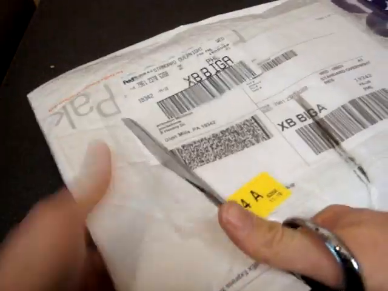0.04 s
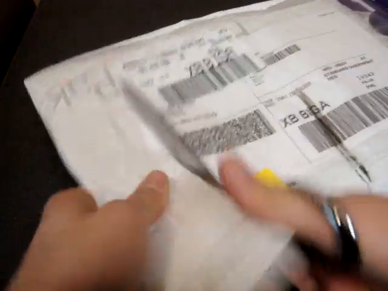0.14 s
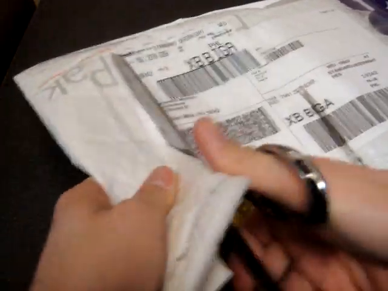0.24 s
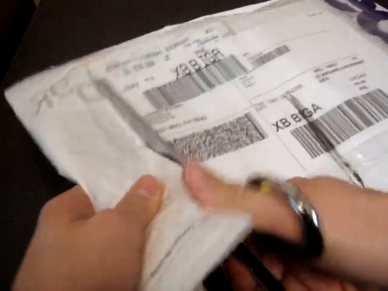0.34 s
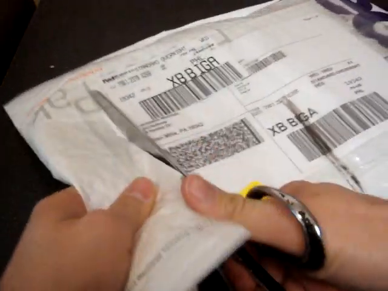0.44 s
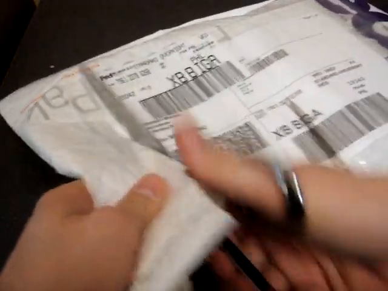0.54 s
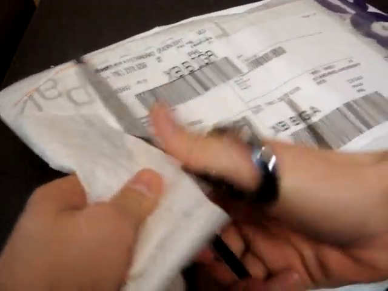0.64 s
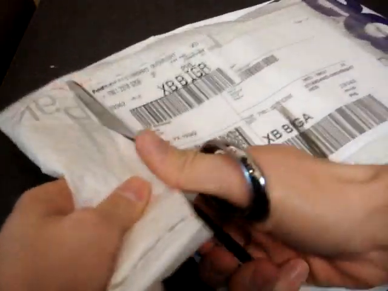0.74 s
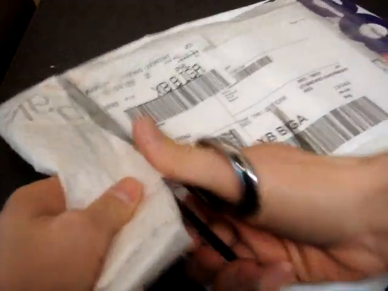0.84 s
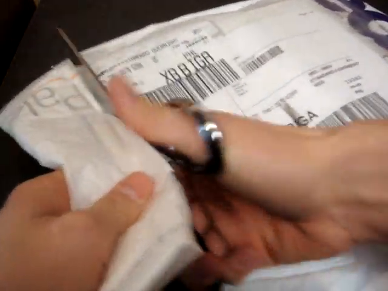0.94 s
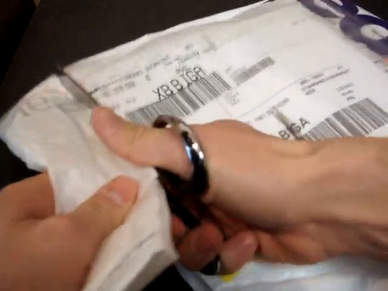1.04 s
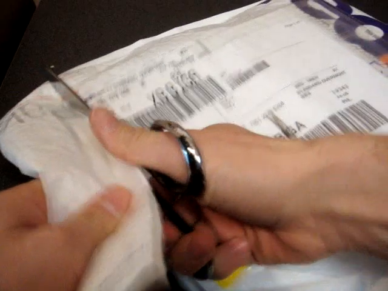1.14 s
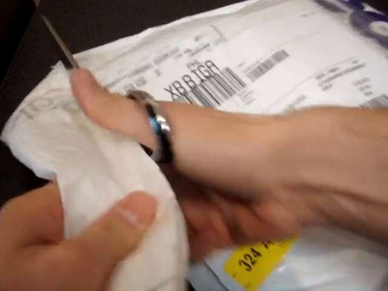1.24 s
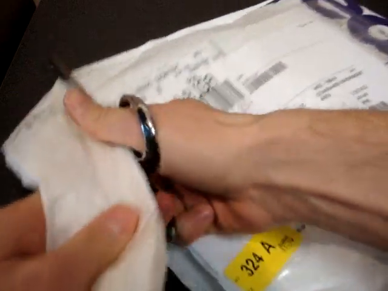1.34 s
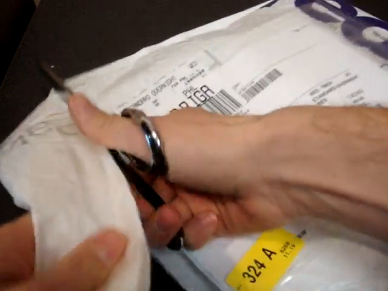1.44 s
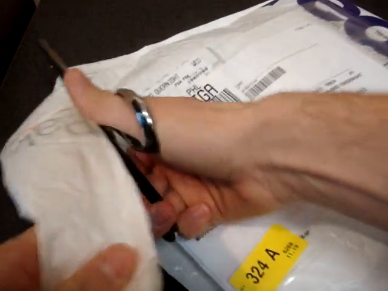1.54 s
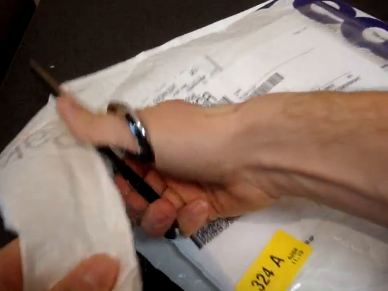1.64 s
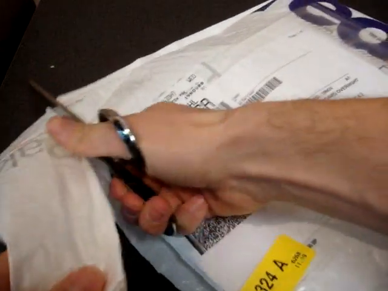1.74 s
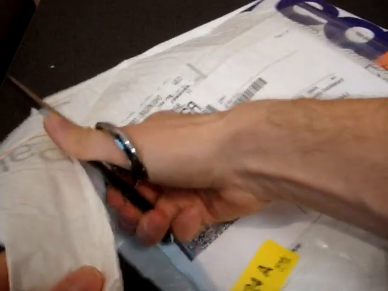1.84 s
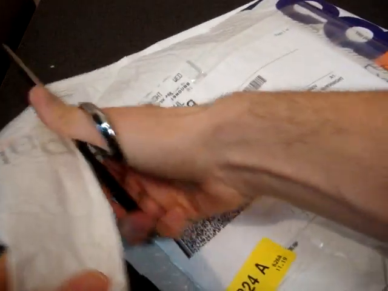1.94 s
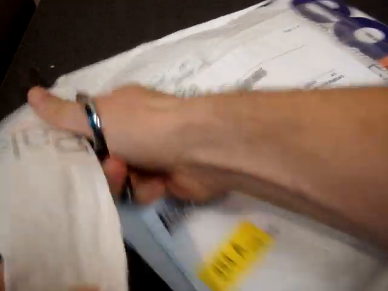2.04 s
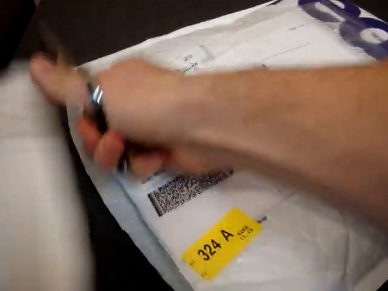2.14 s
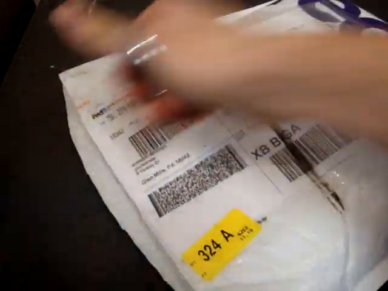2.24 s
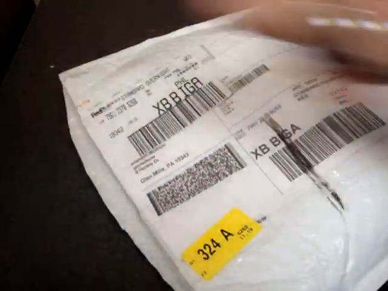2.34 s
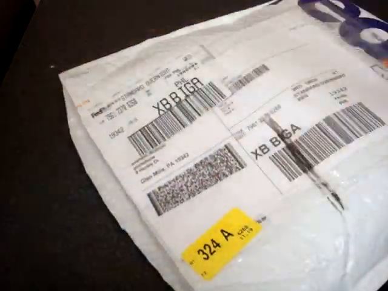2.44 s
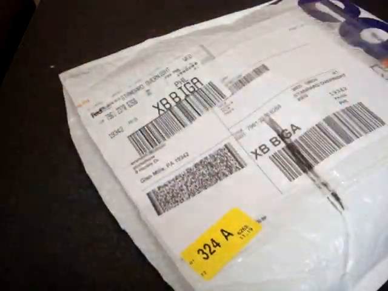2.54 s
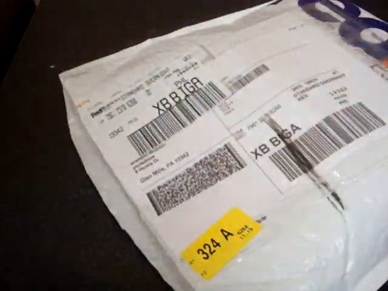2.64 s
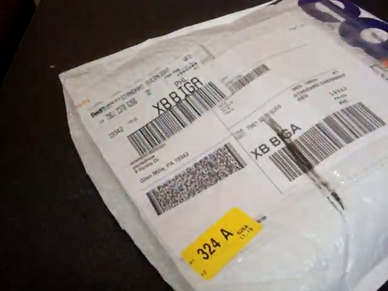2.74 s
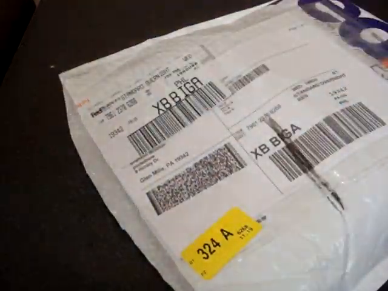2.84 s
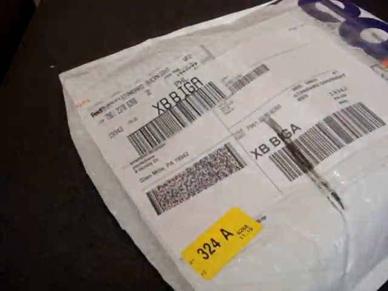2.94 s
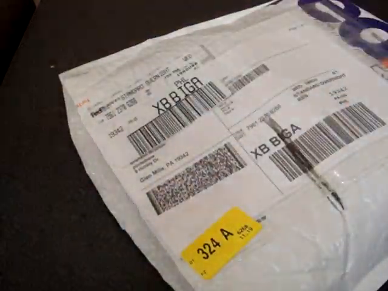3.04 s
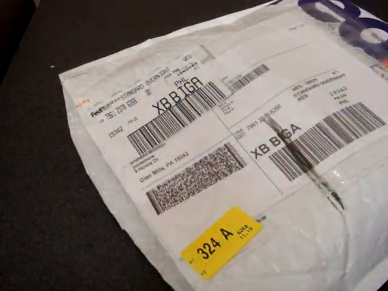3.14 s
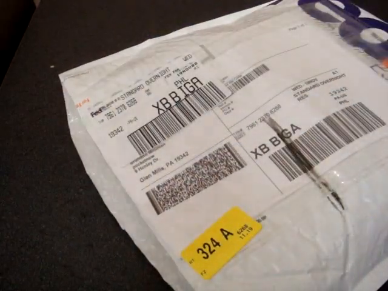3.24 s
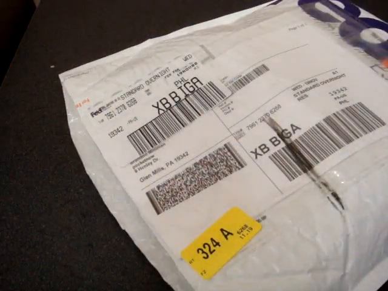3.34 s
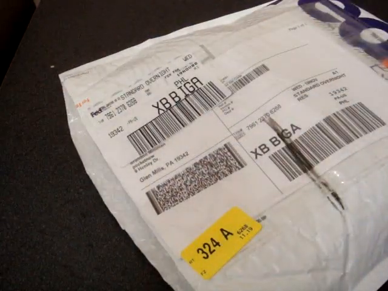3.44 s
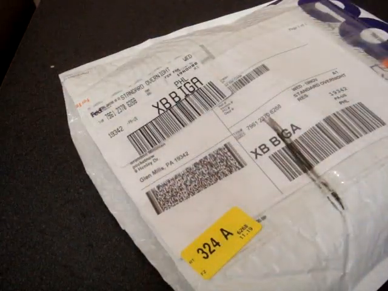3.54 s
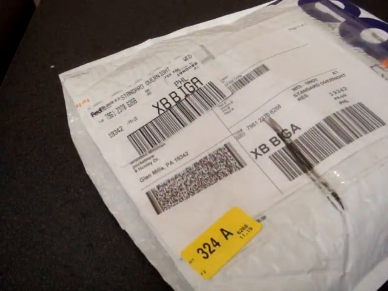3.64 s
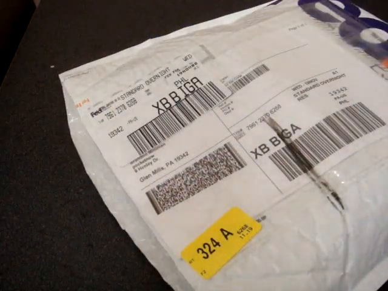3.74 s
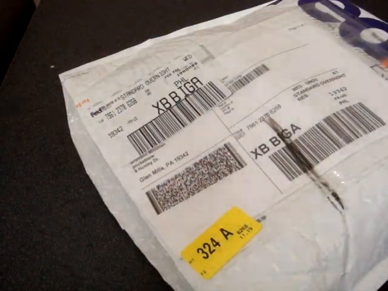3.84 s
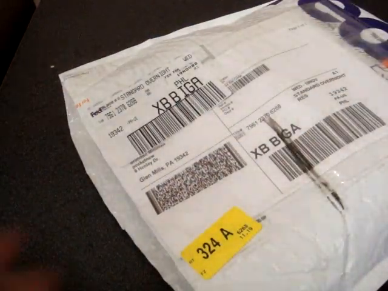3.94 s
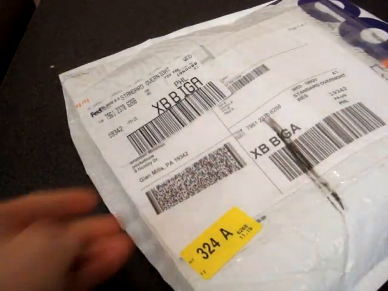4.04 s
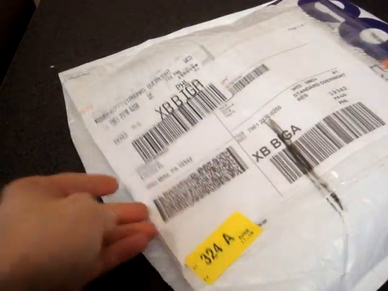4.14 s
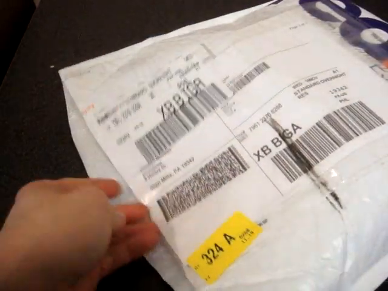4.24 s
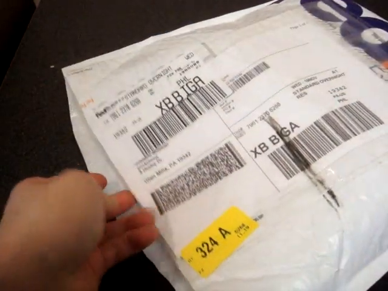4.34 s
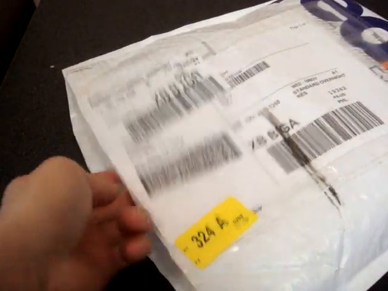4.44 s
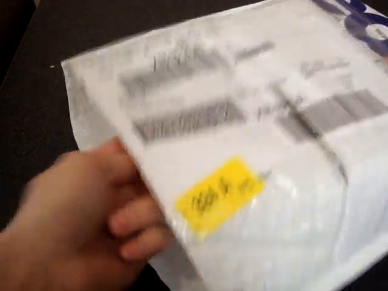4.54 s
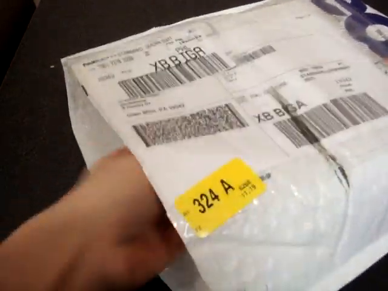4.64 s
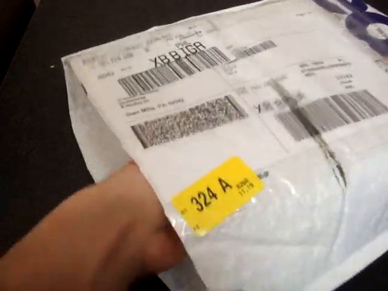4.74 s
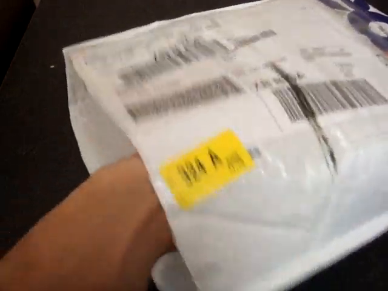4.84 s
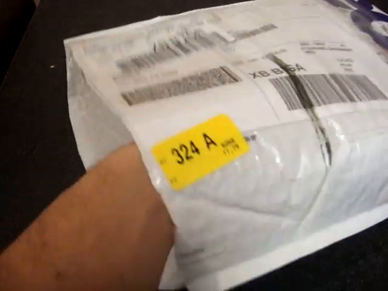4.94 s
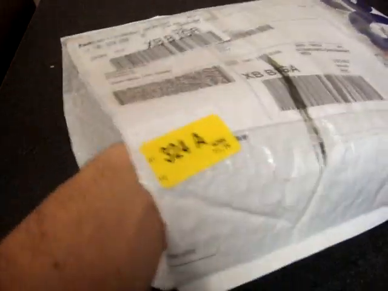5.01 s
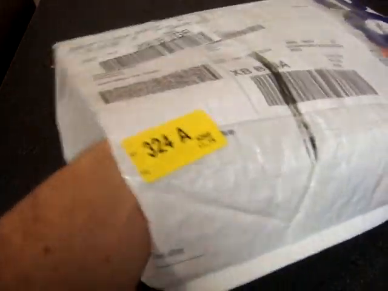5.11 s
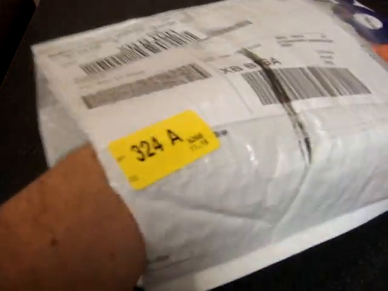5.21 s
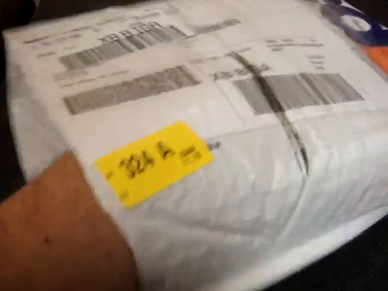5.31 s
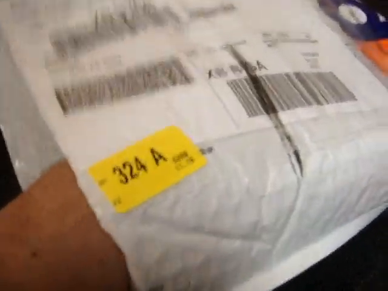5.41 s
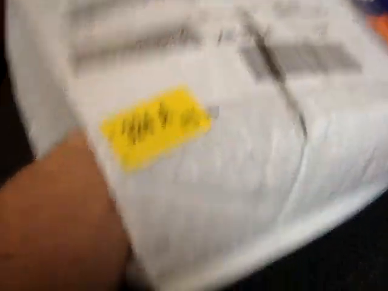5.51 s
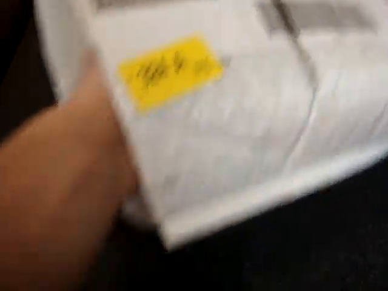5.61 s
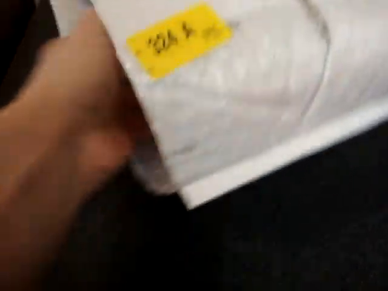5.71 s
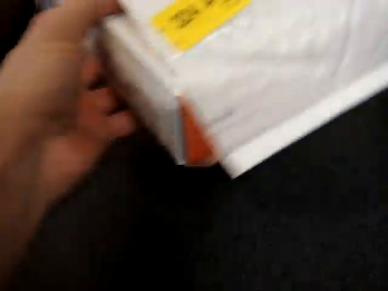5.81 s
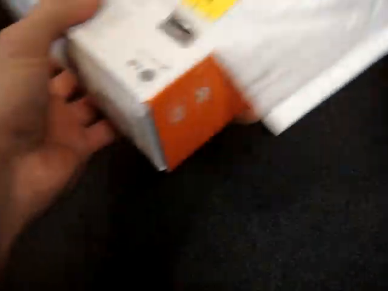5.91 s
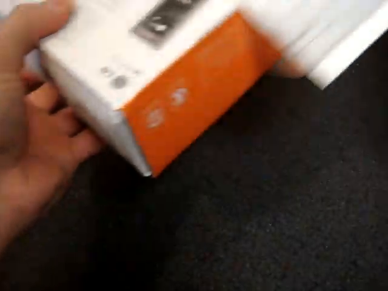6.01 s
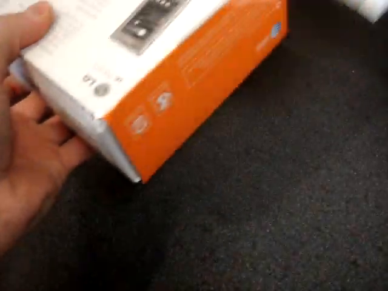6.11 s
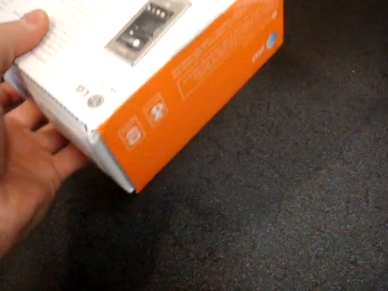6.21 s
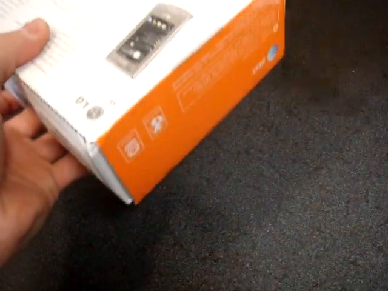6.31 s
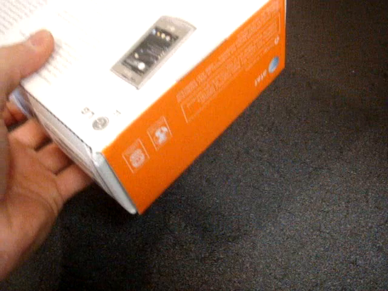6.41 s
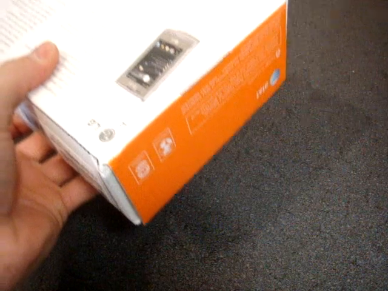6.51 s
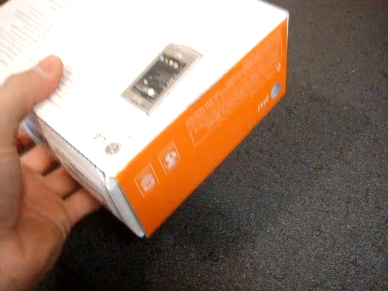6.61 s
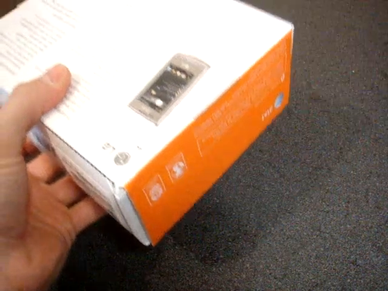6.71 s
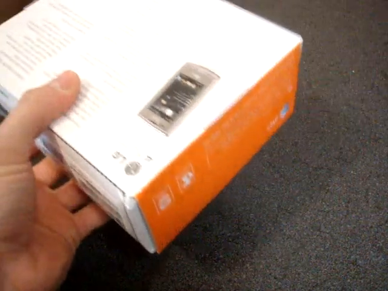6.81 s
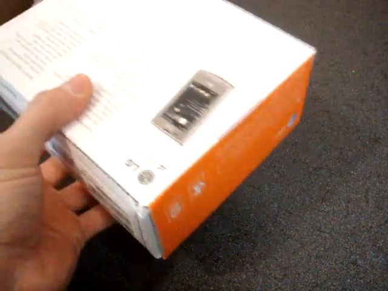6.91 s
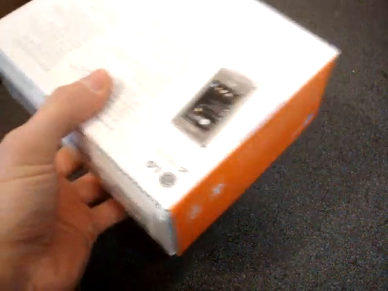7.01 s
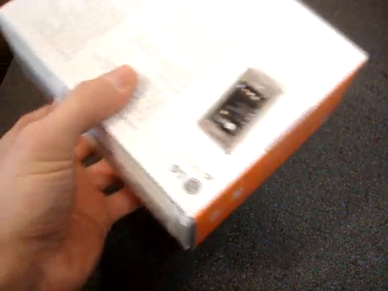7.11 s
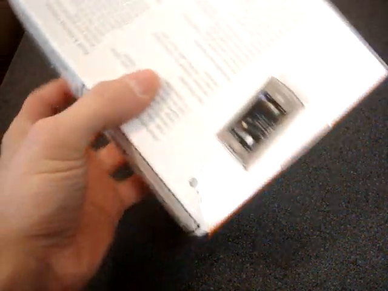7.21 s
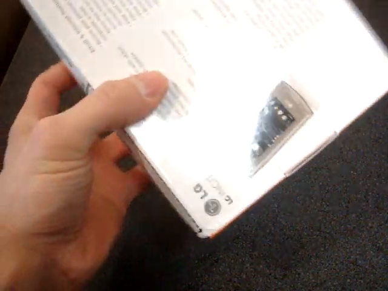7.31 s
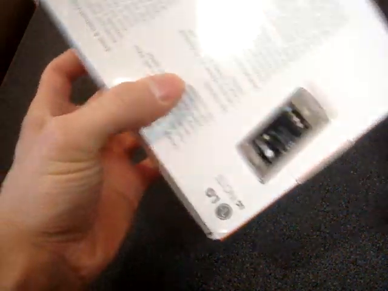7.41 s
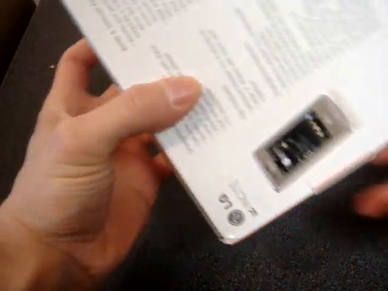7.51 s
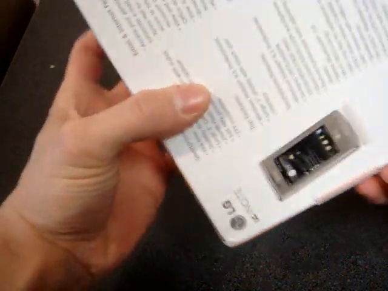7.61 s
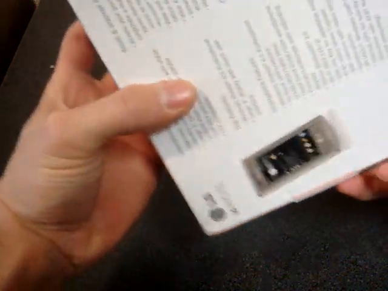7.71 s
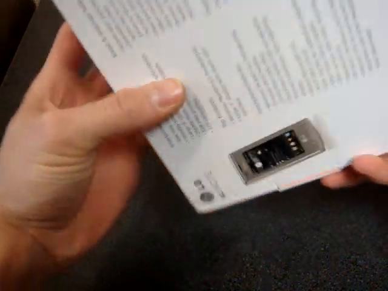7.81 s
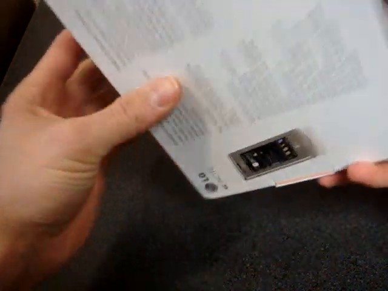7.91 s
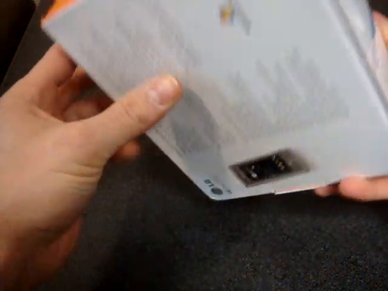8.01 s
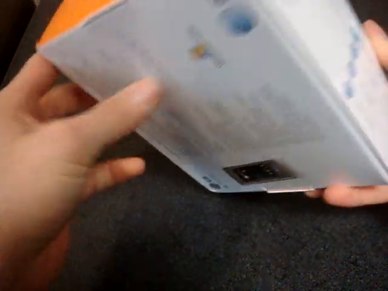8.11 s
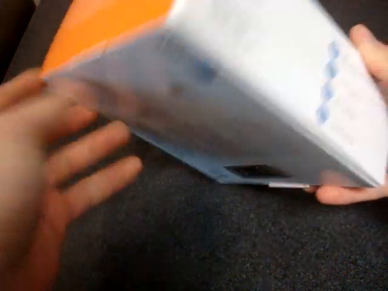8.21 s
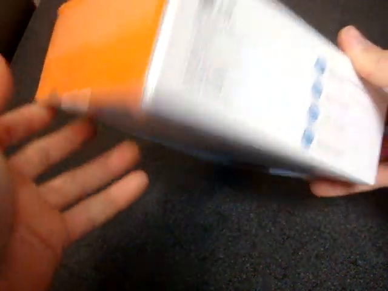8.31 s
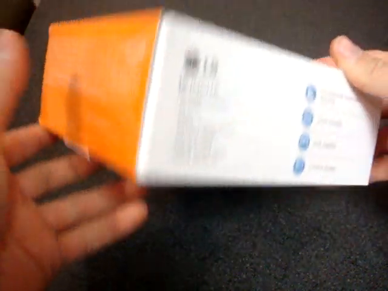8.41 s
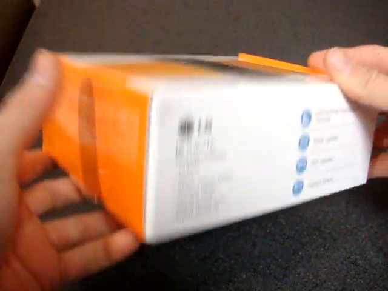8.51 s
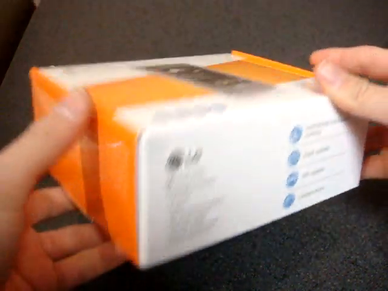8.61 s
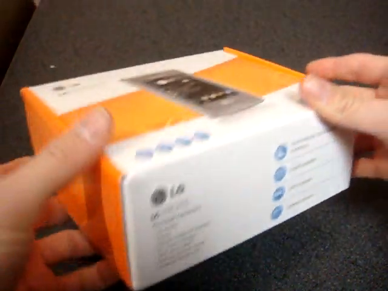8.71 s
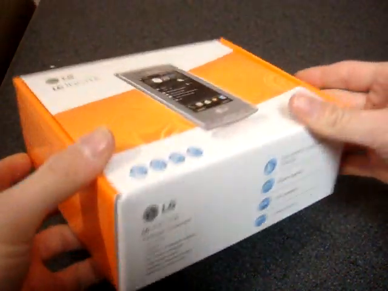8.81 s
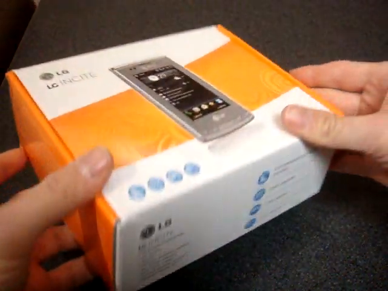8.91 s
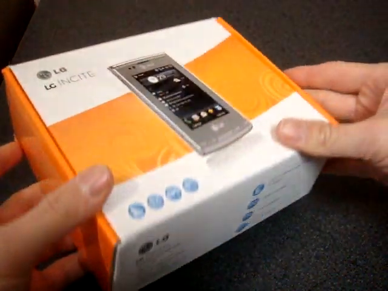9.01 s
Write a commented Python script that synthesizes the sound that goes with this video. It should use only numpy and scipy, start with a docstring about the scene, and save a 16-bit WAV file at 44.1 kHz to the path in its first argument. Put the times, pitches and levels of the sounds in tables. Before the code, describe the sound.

Scissors work through stiff plastic film in quick tugs, bright creases popping so loudly that the peaks clip. Steel then clacks on a table, rattles loosely and skids to a stop. A hand rustles into the envelope and drags out a cardboard box, the taut film ringing roughly. Finally the contents shift with quiet, dull taps. Close microphone, small quiet room, low hiss.

```python
"""Plastic film crackles as a padded envelope is cut open with scissors on a table: friction noise and snapping creases.
The scissors are laid down and slide with a clatter: showers of micro-contacts excite steel and table modes.
A hand pulls a cardboard box out through the film, which rings under the drag, and turns it over: its contents
shift and strike the modes of the card. Dull low bumps, damped cycles, come mostly early, a few under later knocks.
Close microphone in a quiet room, with a little reverberation, hiss and clipped peaks."""
import sys
import numpy as np
from scipy import signal
from scipy.fft import rfft, irfft, next_fast_len
from scipy.io import wavfile

SR = 44100
rng = np.random.default_rng(int(sys.argv[2]) if len(sys.argv) > 2 else 0)


def generate_wav(sig):
    """Save sig (samples, or channels by samples) to the path in sys.argv[1] as 16-bit PCM at SR."""
    pcm = np.round(np.clip(np.atleast_2d(sig).T, -1, 1) * 32767).astype(np.int16)
    wavfile.write(sys.argv[1], SR, pcm)


N = 399546   # length in samples
LOW_HZ, HIGH_HZ = 1200, 4000   # borders of the low, middle and high groups of modes


def amp(db):
    """Decibel definition: level in dB to amplitude gain."""
    return 10 ** (np.asarray(db) / 20)


def rms_one(x):
    """Normalisation: the signal scaled to rms 1."""
    return x / np.sqrt(np.mean(x ** 2) + 1e-20)


def drift(rate_hz):
    """Low-passed noise: a double one-pole at every 20th sample gives slow chance of spread 1."""
    r = np.exp(-2 * np.pi * rate_hz * 20 / SR)
    noise = rng.standard_normal(N // 20 + 2002)
    slow = signal.lfilter([1], [1, -2 * r, r * r], noise)[2000:]   # start-up dropped
    return np.interp(np.arange(N) / 20, np.arange(len(slow)), rms_one(slow))


def grains(per_s, spread_db):
    """Random impulse train: clicks of either sign with exponentially spread levels; rms 1."""
    sizes = amp(spread_db * np.minimum(rng.exponential(1, N), 5)) * rng.choice([-1, 1], N)
    return rms_one(sizes * (rng.random(N) < per_s / SR))


def resonate(x, hz, width_hz):
    """Resonance: a two-pole band-pass applied twice, with steep skirts and gain 1 on top."""
    r = np.exp(-np.pi * width_hz / SR)
    gain = (1 - r * r) / 2
    section = [gain, 0, -gain, 1, -2 * r * np.cos(2 * np.pi * hz / SR), r * r]
    return signal.sosfilt([section, section], x)


def group(hz):
    """Band division: 0 for the lows, 1 for the middle, 2 for the highs."""
    return int(hz > LOW_HZ) + int(hz > HIGH_HZ)


def body(drives, modes):
    """Modal superposition: parallel modes summed in three groups, each with its own drive."""
    out = np.zeros_like(drives)
    for k, (hz, width_hz, db) in enumerate(modes):
        out[group(hz)] += (-1) ** k * amp(db) * resonate(drives[group(hz)], hz, width_hz)
    return out


def blows(events, modes, spread_db, focus_db, crack_db, crack_s, own_db=None):
    """Impact excitation: a first crack and a dying shower of micro-contacts drive the modes.

    Middle modes lose focus_db per octave from the event's pitch; own_db adds a mode at that pitch.
    """
    out = np.zeros(N + SR)
    for s, db, low_db, high_db, pitch_hz, t60 in events:
        t = np.arange(round((t60 + .02) * SR)) / SR
        sizes = amp(spread_db * np.minimum(rng.exponential(1, len(t)), 3.0))
        contacts = sizes * rng.standard_normal(len(t))
        contacts *= 1 + amp(crack_db) * np.exp(-t / crack_s)
        shower = contacts * amp(-60 * t / t60)
        struck = []
        for hz, width_hz, mode_db in modes:
            loss_db = focus_db * abs(np.log2(hz / pitch_hz)) * (LOW_HZ < hz < HIGH_HZ)
            struck.append((hz, width_hz, mode_db - loss_db))
        if own_db is not None:
            struck.append((min(pitch_hz, HIGH_HZ), 0.32 * pitch_hz, own_db))
        parts = body(np.array([shower, shower, shower]), struck)
        peaks = amp(db + np.array([low_db, 0, high_db])) / np.abs(parts).max(axis=1)
        start = round(s * SR)
        out[start:start + len(t)] += peaks @ parts
    return out[:N]


# changing background rustle of film, scissors and box:
# start_s [s], level_db [dB], dull_db (rub against level) [dB], bright_db (hiss against level) [dB]
BACKGROUND_RUSTLE = [(0,-40.5,-2,-2),(1.15,-43,-10,-20),(1.28,-41.5,-11,-6),(1.7,-39,-11,-11),(2,-34,-26,-8),(2.358,-49.5,-16,-2),
                     (2.88,-43.5,-3.5,-1.5),(3.22,-50.5,-9,-34),(3.42,-46,6,-26),(3.548,-31,8,-14),(3.63,-49.5,-12,-10),(3.851,-55.5,-4,3),
                     (3.999,-49.5,-7.5,0),(4.149,-55,-10,1),(4.221,-48,0.5,-2),(4.37,-44.5,-3.5,3),(4.54,-49,2,1.5),(4.841,-45.5,2.5,7),(5.019,-30,-4.5,-5),(5.079,-35.5,0.5,-2),
                     (5.279,-28,-3,-2.5),(5.44,-31,-2,1),(5.49,-38.5,2.5,-2),(5.67,-35.5,-7,-2.5),(5.829,-32.5,3,2),(5.92,-35,-1,3.5),
                     (6.2,-35.5,-2.5,1.5),(6.262,-40,-4.5,2),(6.35,-47.5,-9,3.5),(6.551,-58.5,-1.5,2),(6.75,-54,-5.5,1.5),(7.001,-48.5,-2,1),(7.2,-53.5,-7,-4),
                     (7.56,-52,-2,4.5),(7.7,-59.5,0,-3.5),(7.98,-57,1,-0.5),(8.22,-54.5,1.5,-1),(9.06,-56.5,-4.5,-0.5)]
# scissor strokes and tugs: peak_s [s], level_db [dB], swell_s [s], release_s [s]
STROKES = [(0,-27.5,.05,.1),(.3,-21.5,.035,.09),(.46,-29,.02,0.045),(.555,-26,0.22,.015),(0.598,-35,.015,.06),(.68,-29.5,.04,.05),(.735,-28,.12,.02),(.89,-27,.14,.035),
           (1.071,-26,.1,0.028),(1.16,-25.5,0.022,0.036),(1.2,-24,.05,.014),(1.313,-27.5,.012,.2),(1.46,-21,.07,.035),
           (1.601,-31.5,.02,.05),(1.685,-27,0.14,0.019),(1.729,-36,0.027,.06),(1.79,-35,.02,.03),(1.91,-32.5,.015,.08),(2.05,-28,.07,.06),(2.159,-24.5,0.033,0.071),(4.412,-35,.015,.1),(4.621,-35.5,0.027,.25),(4.868,-33.5,.02,.1)]
STROKE_DROP_DB = 10   # level lost over one swell or release time
STROKE_DULL_DB, STROKE_BRIGHT_DB = -6, -2.5   # against the stroke's rustle


def effort():
    """Power addition: strokes add to the background rustle, giving dull, middle and bright levels in dB."""
    t = np.arange(N) / SR
    s, db, dull_db, bright_db = np.transpose(BACKGROUND_RUSTLE)
    bands_db = (db + dull_db, db, db + bright_db)
    background = np.array([amp(2 * np.interp(t, s, band_db)) for band_db in bands_db])   # power
    power = np.zeros(N)
    for peak, top_db, swell, release in STROKES:
        near = slice(max(round((peak - .5) * SR), 0), round((peak + .5) * SR))
        before, after = (peak - t[near]) / swell, (t[near] - peak) / release
        away = np.where(t[near] < peak, before, after)
        power[near] += amp(2 * (top_db - STROKE_DROP_DB * away))
    shares = amp([[2 * STROKE_DULL_DB], [0], [2 * STROKE_BRIGHT_DB]])
    return 10 * np.log10(background + power * shares)


# modes of the film: pitch_hz [Hz], width_hz [Hz], level_db [dB]
FILM = [(255, 215, -6.5), (407, 234, -5), (597, 530, 3.5), (863, 476, 3.5), (1290, 920, -1),
        (2200, 2070, -4.5), (3330, 2340, -3.5), (4910, 2340, -4.5), (7400, 4000, -4.5), (8150, 6000, -12.5)]
BENDING_DB = 2.6   # spread of the modes' levels
CREASE_PITCHES = 14
CREASE_SHARES = (0.55, 0.46, 0.48)   # creases mixed into friction hiss: lows, middle, highs


def rustle(levels_db):
    """Stick-slip friction: sliding hiss plus small creases, each ringing a few cycles at its own pitch."""
    # modes swell and fade as the sheet changes shape
    bending = [(hz, width_hz, db + BENDING_DB * drift(9.3)) for hz, width_hz, db in FILM]
    sliding = body(rng.standard_normal((3, N)), bending)
    creases = np.zeros_like(sliding)
    clicks = grains(600.0, spread_db=-0.5)
    dealt = rng.integers(0, CREASE_PITCHES, N)
    for k, hz in enumerate(np.geomspace(450.0, 9000.0, CREASE_PITCHES)):
        own = np.abs(dealt - k) <= 1   # a crease covers about an octave
        creases[group(hz)] += resonate(clicks * own + 1e-18, hz, 0.33 * hz)
    grip_db = 0.15 * drift(44.0) + 1.86 * drift(92.0)   # folds stick and slip in clumps
    out = np.zeros(N)
    for hiss_part, crease_part, share, db in zip(sliding, creases, CREASE_SHARES, levels_db):
        mix = rms_one(0.82 * rms_one(hiss_part) + share * rms_one(crease_part))
        out += amp(db + grip_db + 1.28 * drift(54.0)) * mix
    return out


# creases snapping, from loud to faint:
# start_s [s], level_db (middle peak) [dB], lows_db (against it) [dB], pitch_hz [Hz]
SNAPS = [(.0133,-16,2,2050),(.0304,-25,7,1880),(.2184,-16.5,-11,3170),(.2428,-18,-17,2050),(.273,-22,-6,2000),(.2855,-6.5,-4.5,2090),
         (.3027,0.5,-19,2460),(.311,-1.5,-21,2260),(.3365,-10,-4.5,1900),(.3458,-7,-13,2850),(.362,-10.5,-12,2770),(.4549,-14.5,-21,2200),
         (.479,-18,-3,2950),(.515,-35,-8,2500),(.549,-20.5,2.5,2430),(.655,-31,9.5,1500),(.6799,-22,-12,1910),(.71,-25.5,5.5,1550),(.834,-18,-8,3720),
         (.8714,-28,11,1620),(.916,-11.5,-13,1740),(.918,-9.5,-12.5,2470),(1.0044,-32.5,15.5,2050),(1.0519,-19.5,-1,2500),(1.067,-12.5,-2.5,2030),(1.075,-23,-3,2300),
         (1.1496,-8.5,-8,2620),(1.177,-20,3.5,3300),(1.193,-20,3,2000),(1.1985,-10.5,-7.5,2320),(1.3065,-26,7.5,1500),(1.3162,-25.5,12.5,2860),(1.3409,-13.5,-14,1890),
         (1.354,-10,-25,1990),(1.4214,-20,2,2190),(1.429,-11,-7,1930),(1.4522,-14,-4.5,2430),(1.4665,-9.5,-6.5,2360),(1.4705,-3,-17,2570),(1.6073,-13,-27,1580),
         (1.7534,-18,-16,1720),(1.8434,-20,-4.5,3160),(2.038,-13.5,-7,1350),(2.147,-12,-4.5,2220),(2.151,-2.5,-10,2250),(2.1955,-12.5,-14,2220),(2.2,-14,-11,2500),
         (2.2907,-18.5,-32,2240),(2.305,-22,-26,2600),(4.164,-54,19,1330),(4.212,-55,16,1500),(4.2308,-34,-14,2700),(4.332,-40,-20,2720),(4.345,-22.5,-27,1890),(4.4,-30,-7,1450),(4.44,-33,10,1500),(4.559,-18,-4,2270),(4.565,-28,0,1510),(4.581,-18.5,-15,2730),(4.6002,-11,-10,2060),
         (4.648,-25,-7,1970),(4.67,-22,-12,2910),(4.7785,-26,-6,2730),(4.85,-30,-4,3300),(4.8747,-27,6.5,3900),(4.92,-22,-1,3520),(5.0497,-13,-24,3200),(5.13,-16,-11,2460),(5.227,-17,-11,2000),(5.245,-25,-6,2900),
         (5.2829,-11.5,-6.5,1700),(5.307,-21,-3,2000),(5.4016,-15,-9,2560),(5.465,-19,4,1770),(5.7264,-25,-13,2380),(5.8182,-34,6.5,3080),
         (5.8374,-19.5,-6.5,1270),(6.115,-15,-10,3250),(6.132,-16,-19,3040),(6.158,-17,-21,1780),(6.186,-24.5,5.5,2710),
         (6.2158,-21,-27,3300),(6.307,-32,-12,3600)]
SNAP_T60_S, SNAP_SCATTER_DB = 0.04, 2   # decay time; random spread of the highs
SNAP_HIGHS_DB, HIGHS_PER_DB = 0.5, -0.51   # mean highs at a -15 dB peak; louder snaps are duller
SMALL_SNAPS = 50
SMALL_OVER_DB, SMALL_LOWS_DB = 2, -7   # mean peak above the rustle; lows against that peak


def snaps(level_db):
    """Buckling: creases snap, with small random snaps likelier where the rustle is strong."""
    chance = np.cumsum(amp(level_db))
    when, size, pitch = rng.random((SMALL_SNAPS, 3)).T
    at = np.searchsorted(chance, when * chance[-1])
    small_db = level_db[at] + SMALL_OVER_DB + 4.1 * (size - .5)
    small_hz = LOW_HZ * (HIGH_HZ / LOW_HZ) ** pitch
    small = np.transpose([at / SR, small_db, np.full(SMALL_SNAPS, SMALL_LOWS_DB), small_hz])
    events = []
    for s, db, low_db, hz in [*SNAPS, *small]:
        high_db = SNAP_HIGHS_DB + HIGHS_PER_DB * (db + 15) + SNAP_SCATTER_DB * rng.standard_normal()
        events.append((s, db, low_db, high_db, hz, SNAP_T60_S))
    return blows(events, FILM, spread_db=5.0, focus_db=10.0, crack_db=10.5, crack_s=0.00032, own_db=1.5)


# sharp dry ticks of creases, alone or among the snaps: start_s [s], level_db (peak) [dB]
TICKS = [(0.104,-23),(0.148,-16),(.2862,-21),(.202,-19),(0.3073,1),(0.3201,-0.5),(0.401,-12),(0.4587,-11),(.4765,-11),(.481,-6),(.5497,-7.5),(0.6138,-18.5),(.6811,-18),(.7219,-13),
         (0.7314,-9),(.738,-27),(.9272,-24),(1.056,-18),(1.0985,-19),(1.168,-13),(1.424,-15),(1.432,-18),(1.5313,-15),(1.585,-16),(1.5914,-23),(1.7833,-27),(1.7975,-28),
         (1.9116,-19),(2.1433,-7),(2.1523,-7),(2.2548,-18),(4.018,-36),(4.786,-14),(5.118,-16),(5.315,-14),(5.501,-21),(5.5591,-23),(5.742,-17),(5.797,-22),(5.8192,-15),(5.885,-15),(5.9368,-13.5),(6.0306,-16)]
TICK_LOW_HZ, TICK_HIGH_HZ, TICK_WIDTH = 2000, 4250, 1   # range of pitches; width as a share of the pitch
TICK_AFTER_DB, TICK_T60_S = -15, 0.0088   # faint shower after the click


def ticks():
    """Impulse response: one click and a faint shower pass a broad resonance of random pitch."""
    out, t = np.zeros(N), np.arange(SR // 40) / SR
    for s, db in TICKS:
        hz = TICK_LOW_HZ * (TICK_HIGH_HZ / TICK_LOW_HZ) ** rng.random()
        drive = amp(TICK_AFTER_DB - 60 * t / TICK_T60_S) * rng.standard_normal(len(t))
        drive[0] = rng.choice([-1, 1])
        tick = resonate(drive, hz, TICK_WIDTH * hz)
        start = round(s * SR)
        out[start:start + len(t)] += amp(db) * tick / np.abs(tick).max()
    return out


# the box drags along the film on its way out: start_s [s], level_db [dB]
DRAG = [(4.95,-60),(5.0,-35),(5.1,-51),(5.15,-36),(5.22,-29.5),(5.29,-28.5),(5.36,-32),(5.44,-29),(5.5,-64),(6.3,-58)]
# modes of the taut film under the drag: pitch_hz [Hz], width_hz [Hz], level_db [dB]
TAUT_FILM = [(1766, 240, 0), (2120, 300, -4.5), (2580, 370, 0), (3320, 1100, -6)]


def drag():
    """Friction-driven resonance: dense slips of the box edge excite the stretched film."""
    s, db = np.transpose(DRAG)
    slips = grains(4300.0, spread_db=3.0) * amp(1.5 * drift(40.0))
    ring = body(np.array([slips, slips, slips]) + 1e-18, TAUT_FILM).sum(axis=0)
    level_db = np.interp(np.arange(N) / SR, s, db, left=-120, right=-120)
    return amp(level_db) * rms_one(ring)


# scissors touching the table: start_s [s], level_db (middle peak) [dB],
# lows_db, highs_db (against it) [dB], pitch_hz [Hz], t60_s [s]
CLATTER = [(2.329,-29.5,-28,11,3200,0.027),(2.368,-30,-18,2,2570,0.019),(2.4073,-19.5,-1,-6,2030,0.028),(2.413,-32.5,10,-13,1400,0.034),
           (2.4294,-24.5,-31,5.5,2980,0.046),(2.44,-29,-14,11,2000,0.038),
           (2.5369,-19.5,-6.5,-4,2570,0.024),(2.55,-22,-13,-8,2500,0.046),(2.558,-41,0,-10,1500,0.04),(2.6184,-34.5,-6,5.5,3640,0.63),(2.668,-32,-5,2,1400,0.026),(2.688,-30,-7,-12,1600,.025),(2.7535,-23,-10,-7,2500,0.012),(2.826,-32,4,-30,1800,0.012),
           (2.8411,-4.5,-13,-1.5,1720,0.06),(2.8455,-7,-5.5,-4.5,1530,0.039),(2.9445,-15,-4,-9,1950,0.024),(2.955,-42,3,-9,3300,0.14),
           (2.9652,-23,-14,1.5,3720,0.21),(3.0824,-27.5,-26,1,2550,0.059),(3.102,-24,-17,-2,3000,0.024),
           (3.24,-19.5,-6.5,3,2580,0.054),(3.254,-27.5,-9,10.5,2600,0.028),(3.291,-33,-3,5,3290,.08),(3.297,-32.5,-4,14,3290,0.079),(3.305,-33,-14,15,3290,0.071),(3.315,-36,-6,15,3000,0.052),(3.3772,-2.5,-14,-14,2790,0.025),(3.384,-9,-5,-15,2300,0.022)]
# modes of steel on the table: pitch_hz [Hz], width_hz [Hz], level_db [dB]
STEEL_ON_TABLE = [(210, 350, -12.5), (415, 160, -10), (650, 234, -2), (890, 230, -10.5), (1076, 220, -2),
                  (1339, 175, 7.5), (1540, 185, 4), (1757, 230, 6), (2047, 280, 0.5), (2410, 330, 3),
                  (2810, 320, 3), (3157, 270, 5.5), (3440, 1200, -2.5), (4620, 4100, 7), (5540, 510, 14.5),
                  (7160, 3700, 8.5)]


def clatter():
    """Impact excitation: each touch of the scissors strikes the modes of steel and table."""
    return blows(CLATTER, STEEL_ON_TABLE, spread_db=1.5, focus_db=12.0, crack_db=-5.5, crack_s=0.00077)


# the scissors skid and chatter to a stop: start_s [s], level_db (middle peak) [dB], pitch_hz [Hz]
SKID = [(3.4047,-4,2840),(3.4135,-9,2800),(3.4205,3.5,1570),(3.431,2.5,1710),(3.4381,-0.5,1550),(3.4474,-8,1770),(3.4656,0.5,2000),
        (3.4739,-0.5,1400),(3.4838,0,2900),(3.4979,0.5,2800),(3.5086,-0.5,1790),(3.5201,-1.5,2600),(3.5265,-11,1550),(3.539,-7,2000),
        (3.5506,-4,1900),(3.5591,-6,1500),(3.574,-15,1500),(3.59,-24,2200),(3.6,-34,1500),(3.64,-35,1500)]
SKID_T60_S, SKID_LOWS_DB, SKID_HIGHS_DB = 0.11, -11.5, -12   # highs as they are before the skid slows
SKID_SLOWS_S, SKID_DULLS_DB_PER_S = 3.46, 130   # from here on the highs fade


def skid():
    """Chatter: repeated impacts on the same modes, losing their highs as the sliding slows."""
    events = []
    for s, db, hz in SKID:
        high_db = SKID_HIGHS_DB - SKID_DULLS_DB_PER_S * max(s - SKID_SLOWS_S, 0)
        events.append((s, db, SKID_LOWS_DB, high_db, hz, SKID_T60_S))
    return blows(events, STEEL_ON_TABLE, spread_db=1.5, focus_db=8.5, crack_db=13.5, crack_s=0.00034)


# the loose blades rattle as the scissors rock: start_s [s], level_db (middle peak) [dB],
# lows_db, highs_db (against it) [dB], pitch_hz [Hz], t60_s [s]
RATTLE = [(3.1381,-11.5,-0.5,-5,1500,0.051),(3.1737,-14.5,-1,-3.5,1700,0.074),(3.1925,-20,-1,-25,1700,0.14),(3.2045,-29,2,-18,1420,0.056),
          (3.212,-21.5,-0.5,-29,1700,0.052),(3.2205,-24,-3,-34,1710,0.069),(3.2335,-24,-2,4,1400,0.036)]
# modes of the loose blades: pitch_hz [Hz], width_hz [Hz], level_db [dB]
BLADES = [(323, 260, -3.5), (666, 250, -10.5), (900, 320, -0.5), (1440, 190, 8.5), (1720, 450, -1),
          (2320, 540, -6), (2730, 310, -1), (3400, 420, 3), (4003, 410, 10.5), (4900, 900, -2),
          (5600, 1500, 1), (7500, 6200, -5)]


def rattle():
    """Impact excitation: showers of contacts drive the modes of the loose blades."""
    return blows(RATTLE, BLADES, spread_db=1.5, focus_db=3.0, crack_db=-9.0, crack_s=0.00046)


# the box knocking free, its contents shifting, fingers on the card: start_s [s],
# level_db (middle peak) [dB], lows_db, highs_db (against it) [dB], t60_s [s]
SHIFTS = [(6.223,-30,-3,-15,0.066),(6.228,-21.5,0.5,-18,0.076),(6.237,-21,-4,-8,0.059),(6.663,-43,-6,12,.04),(7.056,-34,-3.5,1,.2),(7.1567,-19.5,-1,-12,0.11),(7.164,-30,3,6,0.22),(7.2877,-39,8.5,-12,0.054),
          (7.359,-18.5,2,-7,0.23),(7.374,-23,-8.5,3,0.35),(7.3896,-29,-12,-13,0.18),(7.515,-34,-5,-1,0.5),
          (7.738,-32,1.5,-15,0.18),(7.7494,-28,0,-1,0.071),(7.7513,-23,-10,5.5,0.02),(7.768,-29.5,3.5,-22,0.056),(7.776,-23,-6,-5,0.042),(7.786,-27.5,2.5,-0.5,0.23),
          (7.806,-25,2.5,-5,0.19),(7.818,-29.5,-4,2.5,0.27),(7.845,-40,3,-8,0.19),(7.891,-41,6,-12,0.1),(7.901,-39.5,7.5,-14,0.1),(7.912,-41,1,-12,.1),
          (8.034,-41,5,-9,0.1),(8.3866,-33,-3,7,0.12),(8.6674,-32.5,0.5,-12,0.037),(8.7366,-35,-4.5,4,0.067),
          (8.8942,-36,1.5,-14,0.055)]
# modes of the cardboard box: pitch_hz [Hz], width_hz [Hz], level_db [dB]
BOX = [(207, 240, -2), (299, 170, 4), (480, 300, 3.5), (710, 340, 3.5), (974, 460, -4), (1267, 370, -5),
       (1900, 910, -9.5), (2660, 2000, -15), (5000, 3400, 5), (8500, 4000, -4)]
SHIFT_HZ = 1690   # pitch favoured by every shift


def box_shifts():
    """Impact excitation: knocks, shifting contents and fingers drive the modes of the card."""
    events = [(s, db, low_db, high_db, SHIFT_HZ, t60) for s, db, low_db, high_db, t60 in SHIFTS]
    return blows(events, BOX, spread_db=3.0, focus_db=3.0, crack_db=6.0, crack_s=0.00051)


# dull low bumps, most of them early, a few under later knocks:
# start_s [s], level_db (peak) [dB], pitch_hz [Hz]
BUMPS = [(.08, -22.5, 114), (.094, -20, 148), (0.118, -16.5, 184), (.139, -28, 130), (0.154, -33, 190),
         (.173, -24, 176), (.195, -27.5, 120), (0.469, -42, 90.5), (.6, -37, 120), (.82, -36, 95),
         (3.14, -31.5, 165), (3.437, -32, 160), (4.162, -30, 300), (5.459, -37, 165), (6.222, -58, 147),
         (6.228, -26, 350), (7.361, -43, 149)]


def bumps():
    """Damped oscillation: each bump is one or two soft low cycles."""
    out, t = np.zeros(N), np.arange(SR // 4) / SR
    for s, db, hz in BUMPS:
        swing = np.sin(2 * np.pi * hz * t) * (hz * t) ** 2 * np.exp(-3.2 * hz * t)
        start = round(s * SR)
        out[start:start + len(t)] += amp(db) * swing / np.abs(swing).max()
    return out


ROOM_T60_S, ROOM_DB = 0.17, -18   # decay time near 670 Hz, shorter above; gain of the echoes


def room(x):
    """Reverberation: eight feedback delays on a padded frequency grid, treble dying sooner."""
    size = next_fast_len(N + SR)
    w = 2 * np.pi * np.arange(size // 2 + 1) / size   # radians per sample
    echo = np.zeros(len(w), complex)
    lags = (rng.uniform(.008, 0.028, 8) * SR).astype(int)
    for k, lag in enumerate(lags):
        loss_db = 60 * lag / SR / ROOM_T60_S * (0.5 + 5.2 * w)
        loop = amp(-loss_db) * np.exp(-1j * w * lag)
        echo += (-1) ** k * loop / (1 - loop)
    return irfft(rfft(x, size) * echo, size)[:N]


# spectrum of room and microphone hiss: pitch_hz [Hz], level_db (relative density) [dB per Hz]
HISS = [(24, -55), (40, -15), (118, -8.5), (200, 0), (300, 7), (450, 2.5), (640, 1), (860, -11.5),
        (1500, -6.5), (2500, -11), (6020, -25), (10000, -19), (13000, -53), (22000, -120)]
HISS_DB, HISS_WAVERS_DB = -52.5, 0.8   # mean level; spread of its slow wavering


def hiss():
    """Spectral shaping: noise filtered along a log-frequency curve, its level wavering slightly."""
    hz = np.arange(1, N // 2 + 2) * SR / N
    point_hz, point_db = np.transpose(HISS)
    shape = amp(np.interp(np.log(hz), np.log(point_hz), point_db))
    noise = irfft(rfft(rng.standard_normal(N)) * shape, N)
    return amp(HISS_DB + HISS_WAVERS_DB * drift(2.1)) * rms_one(noise)


def scene():
    """Superposition: film, scissors and box close by, a little room, low bumps and hiss."""
    levels_db = effort()
    film = rustle(levels_db) + snaps(levels_db[1]) + ticks() + drag()
    scissors = clatter() + skid() + rattle()
    near = film + scissors + box_shifts()
    return (near + amp(ROOM_DB) * room(near) + bumps() + hiss())[None]


CEILING, CUTOFF_HZ = .92, 10000   # amplitude limit before filtering; top of the passband


def record(dry):
    """Saturation and band-limiting: peaks squeezed near full scale, deepest bass and top cut."""
    squeezed = np.tanh((np.abs(dry) / CEILING) ** 3) ** (1 / 3)   # nearly linear until close to the ceiling
    wet = CEILING * squeezed * np.sign(dry)
    wet = signal.sosfilt(signal.butter(1, 28.0, "high", fs=SR, output="sos"), wet)
    return signal.sosfilt(signal.ellip(12, .5, 80, CUTOFF_HZ, fs=SR, output="sos"), wet)


dry = scene()
out = record(dry)
generate_wav(out)
```